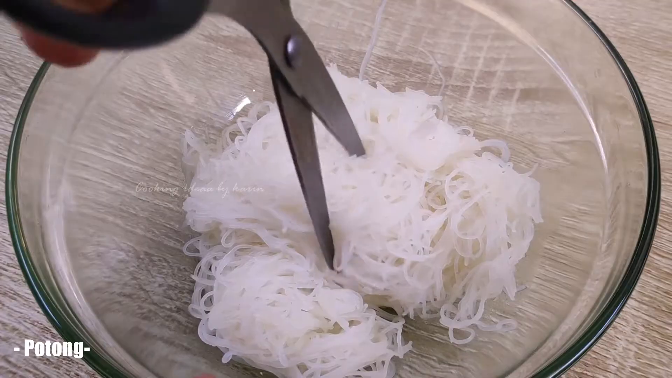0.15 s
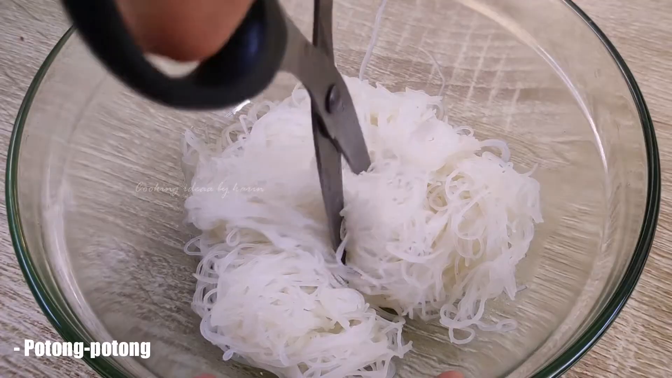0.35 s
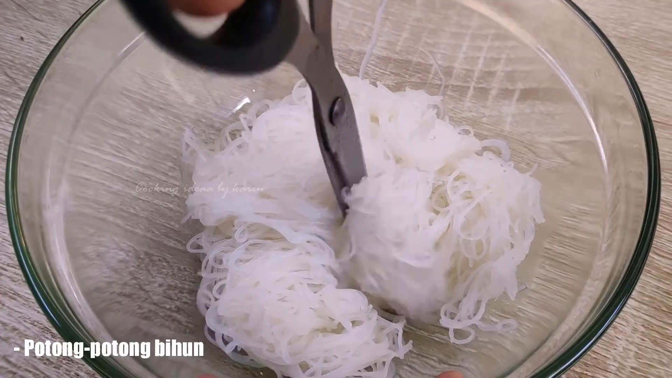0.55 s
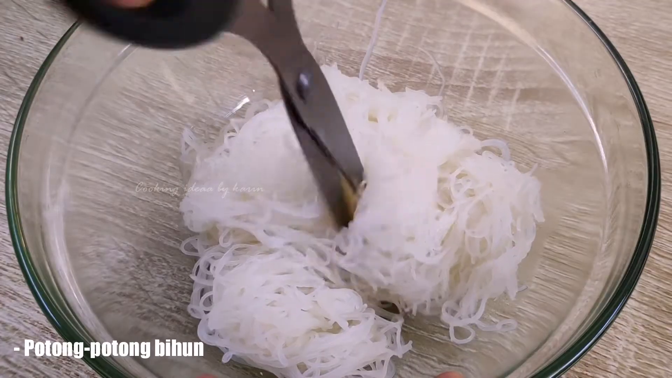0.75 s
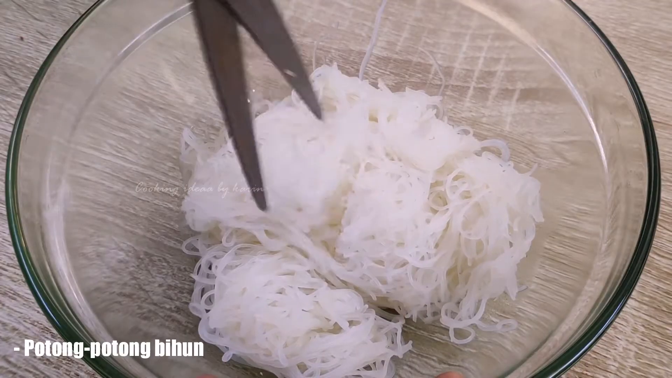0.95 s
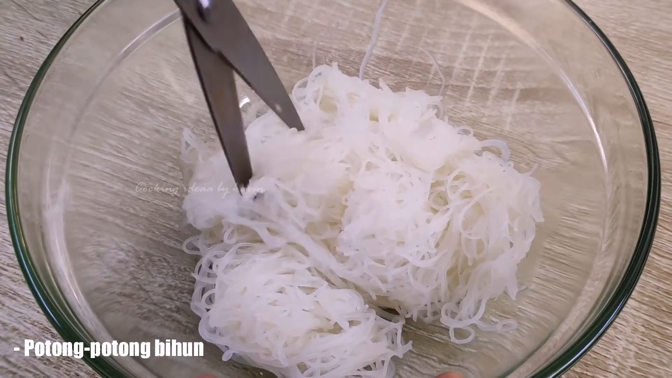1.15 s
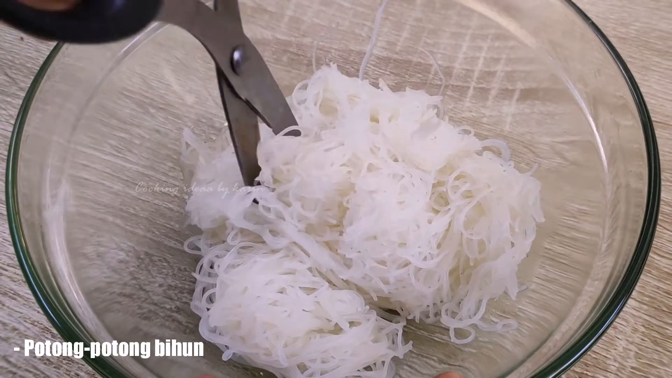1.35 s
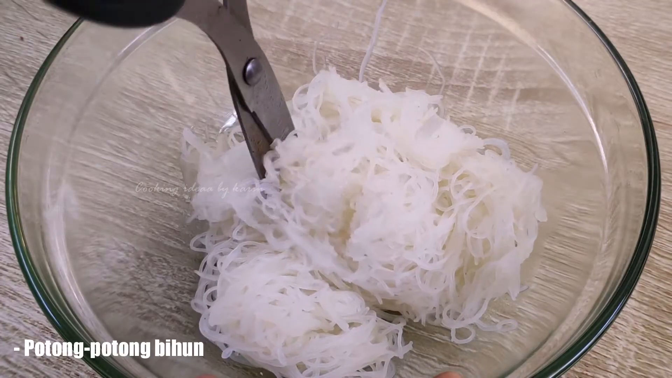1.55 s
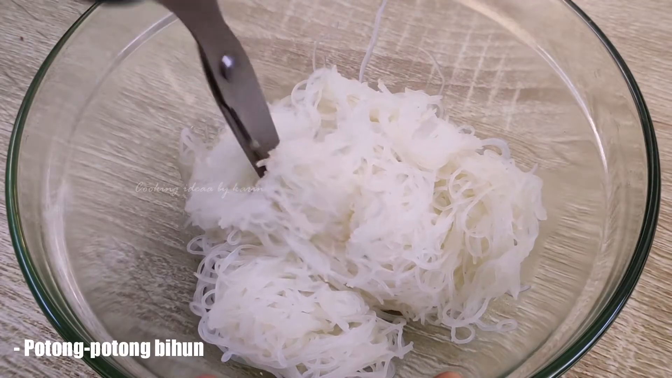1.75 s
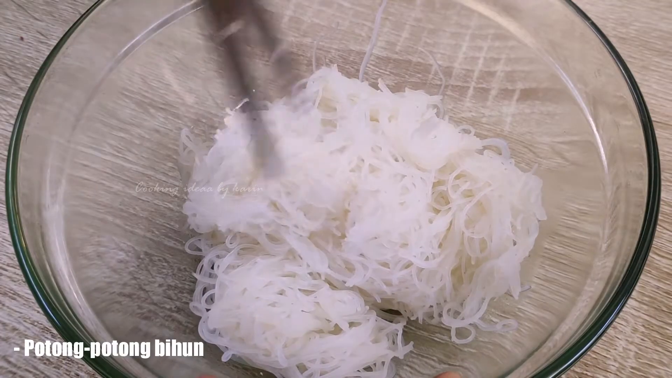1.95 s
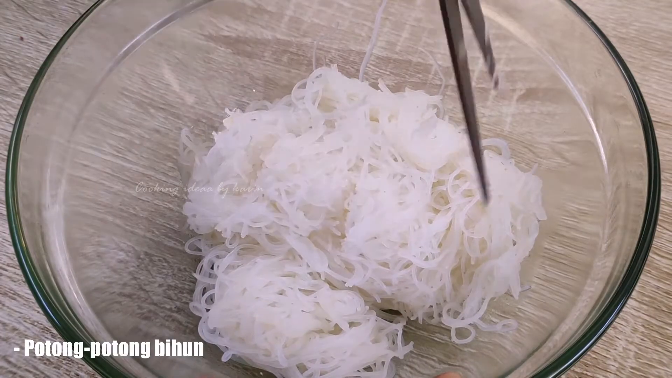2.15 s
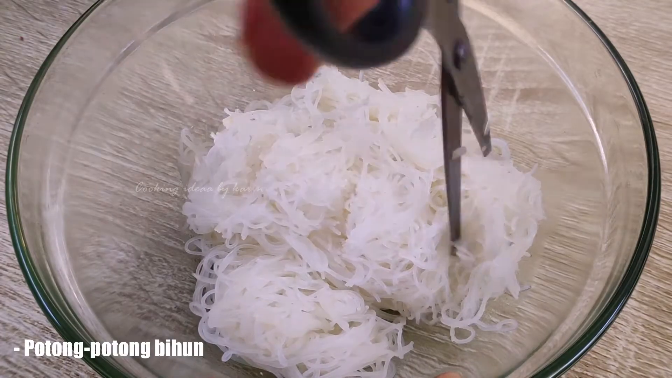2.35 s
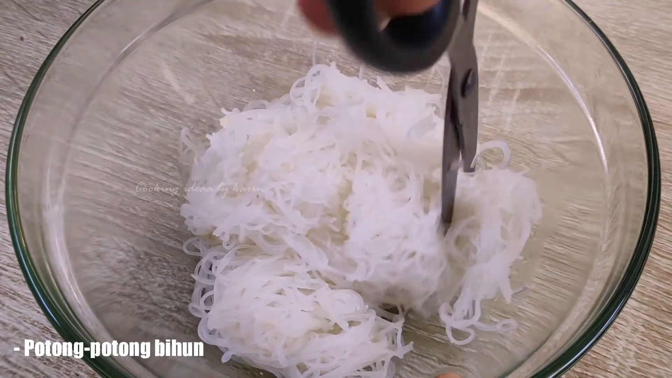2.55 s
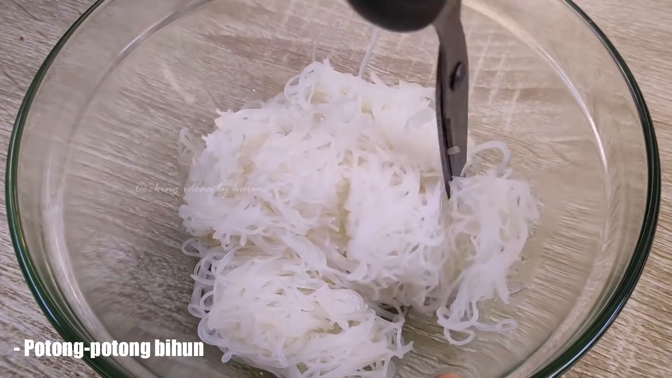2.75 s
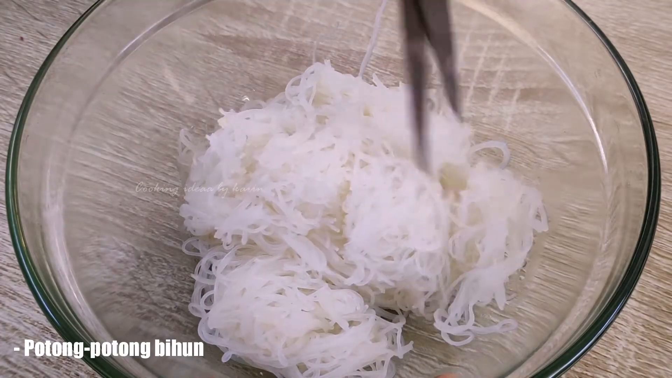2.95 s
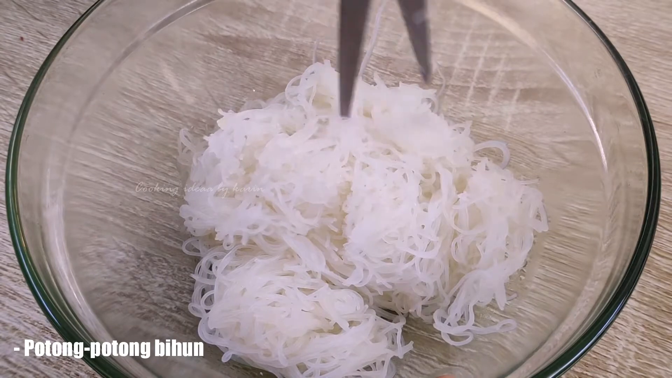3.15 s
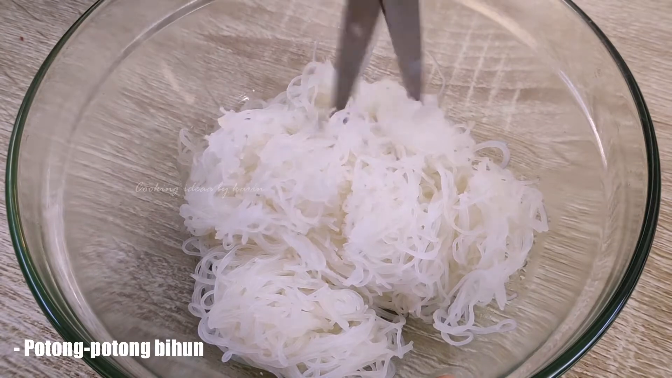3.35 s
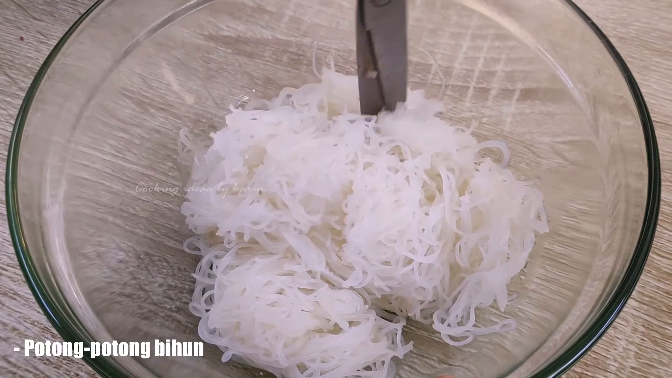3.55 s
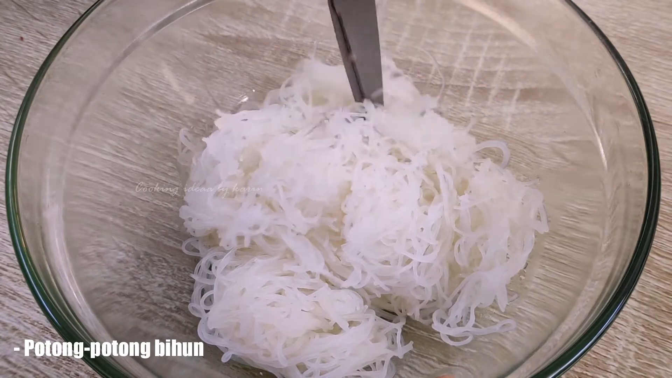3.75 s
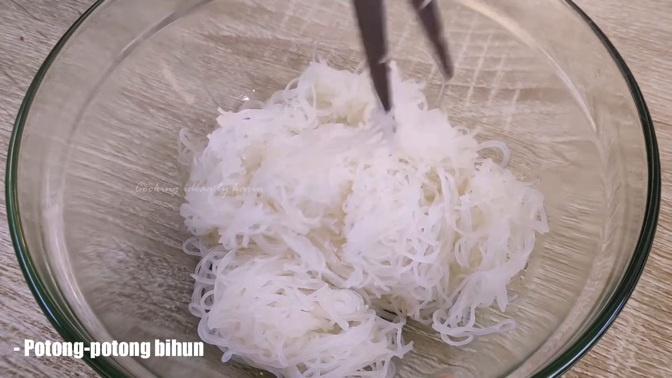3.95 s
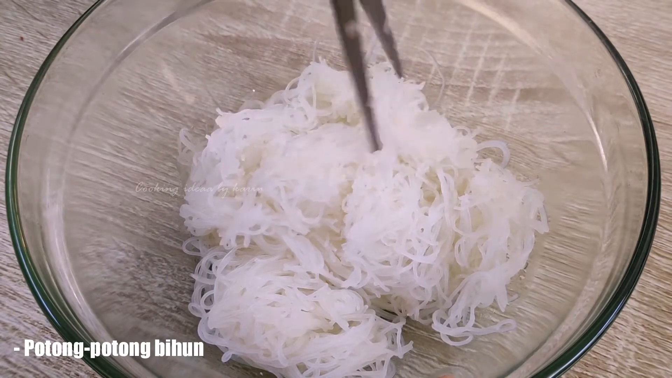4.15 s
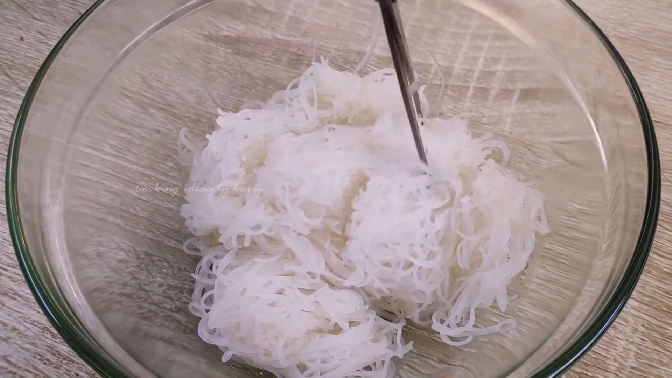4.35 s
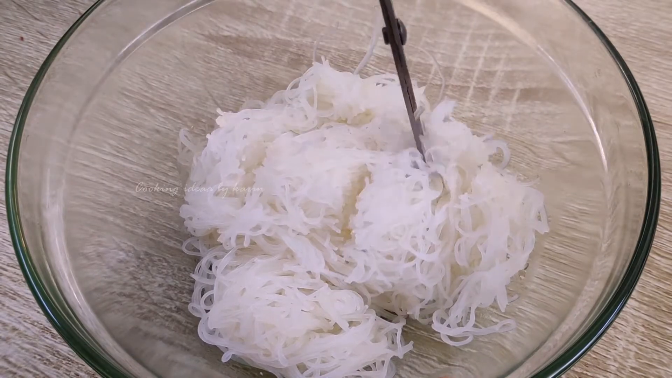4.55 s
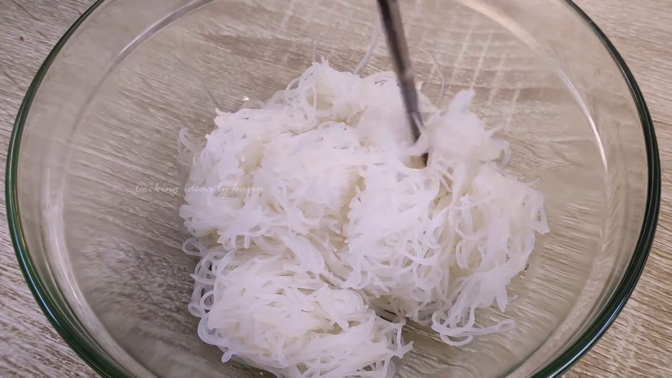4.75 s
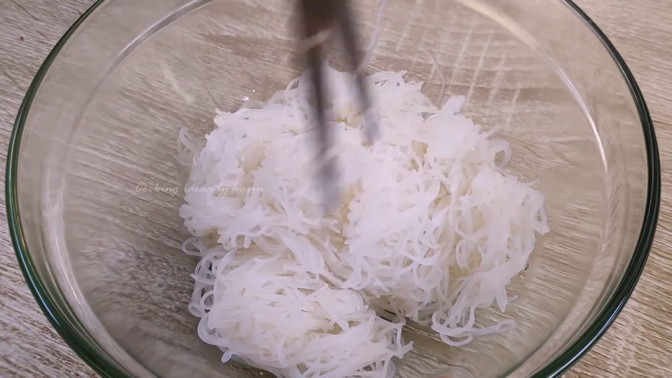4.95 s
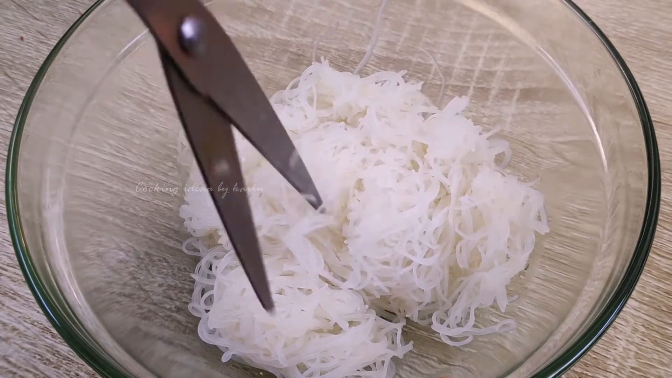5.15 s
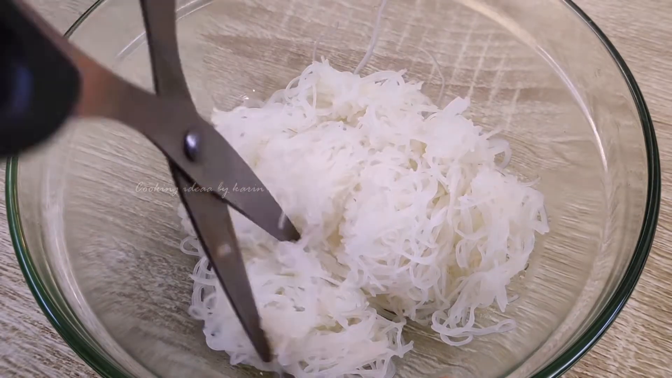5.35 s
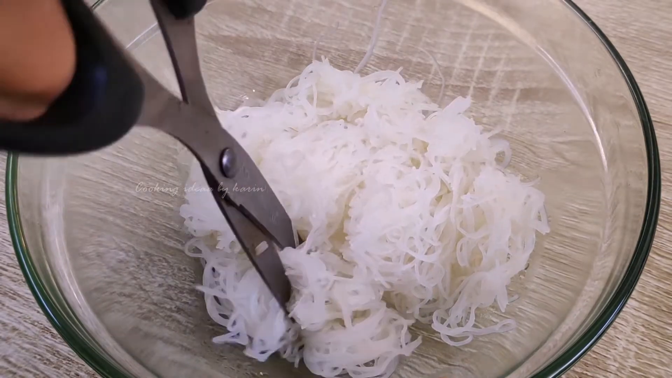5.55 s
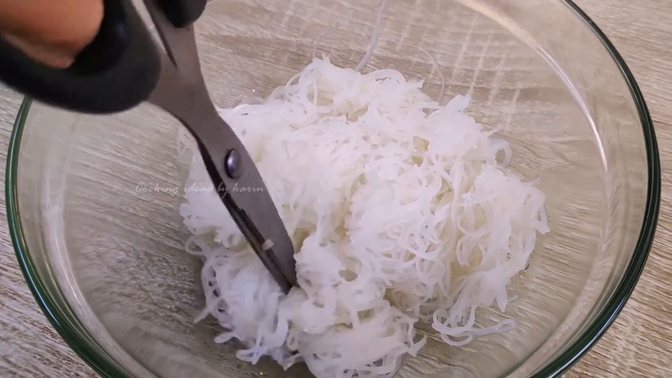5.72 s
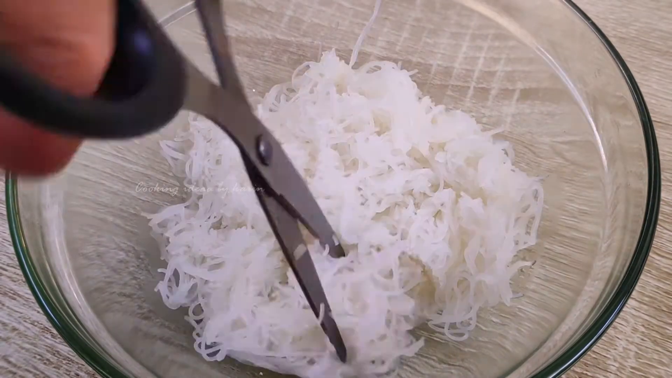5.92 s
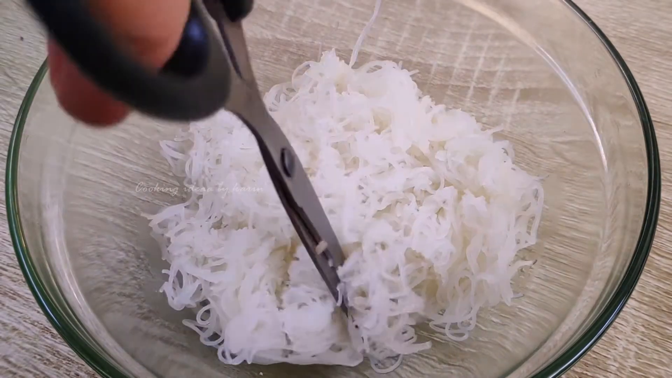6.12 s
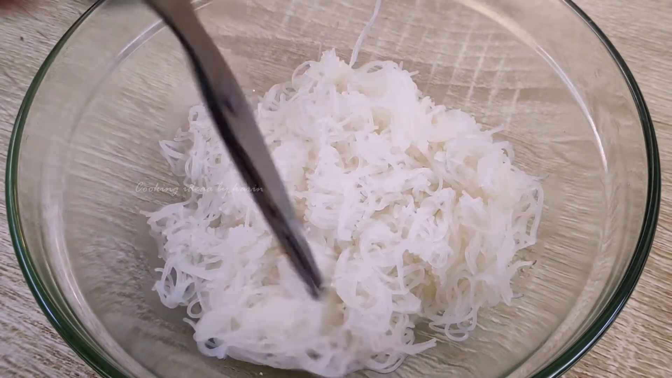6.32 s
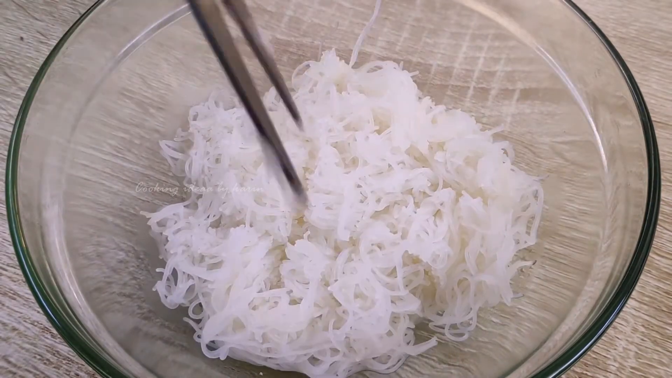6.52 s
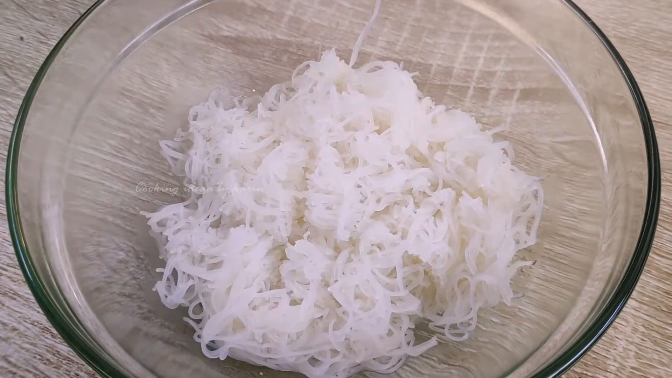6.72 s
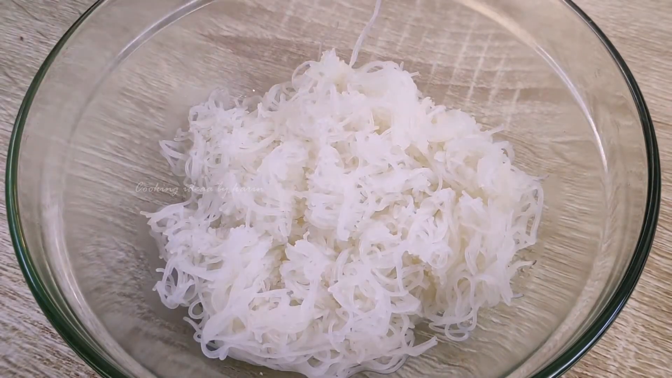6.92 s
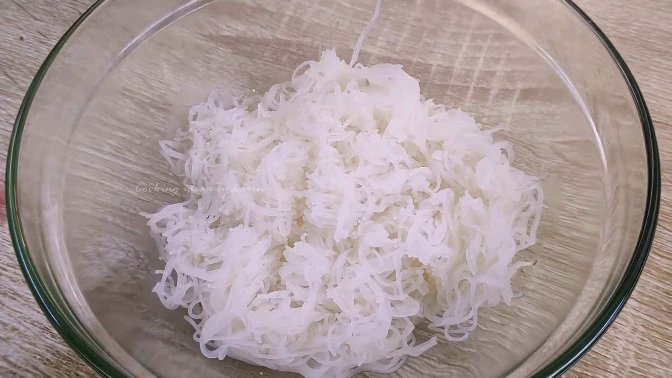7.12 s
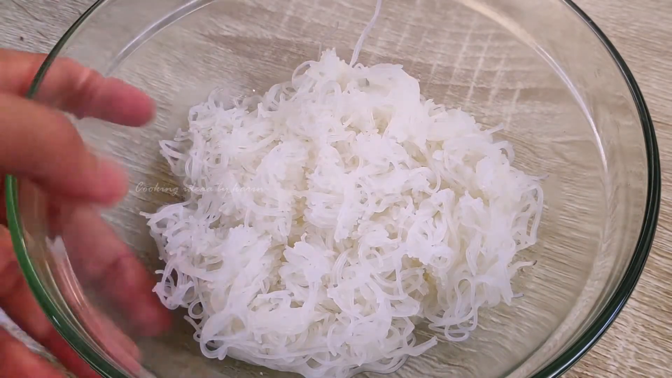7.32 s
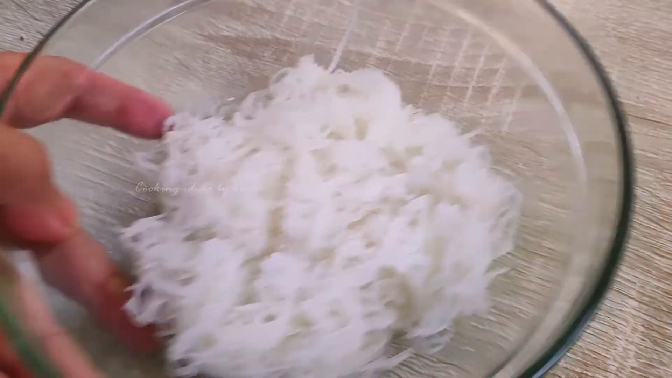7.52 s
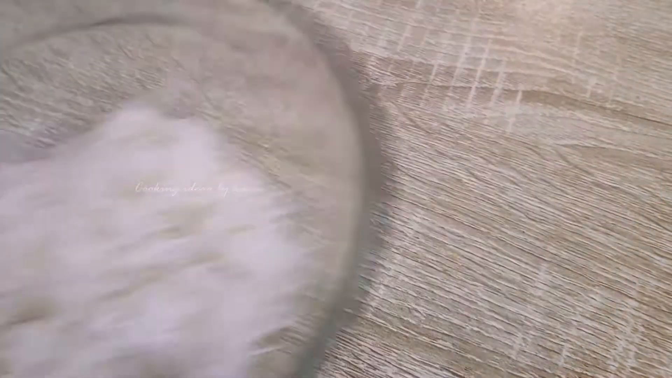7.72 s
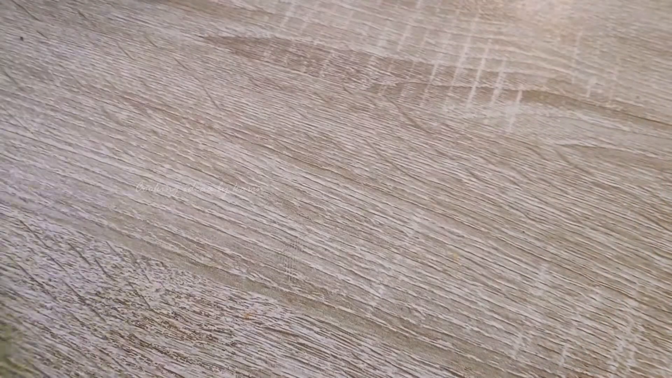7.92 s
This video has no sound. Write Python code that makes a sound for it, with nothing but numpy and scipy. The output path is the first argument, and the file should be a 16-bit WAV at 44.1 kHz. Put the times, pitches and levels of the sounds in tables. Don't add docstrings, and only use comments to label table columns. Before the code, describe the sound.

Seven bright steel scissor snaps, with blade ticks and hard glass knocks between them, end in a short gritty drag of a glass bowl on wood.

```python
import sys
import numpy as np
from scipy import signal
from scipy.fft import rfft, irfft
from scipy.io import wavfile
from scipy.ndimage import uniform_filter1d

SR = 44100
rng = np.random.default_rng(int(sys.argv[2]) if len(sys.argv) > 2 else 0)


def volts_from_db(level):
    exponent = np.asarray(level, float) / 20
    return 10 ** exponent


def digitize_waveform(pressure):
    field = np.atleast_2d(pressure).T
    bounded = np.clip(field, -1, 1)
    quanta = np.round(bounded * 32767).astype(np.int16)
    wavfile.write(sys.argv[1], SR, quanta)


N = 356138
SCENE_CHANGE_S = 5.94


def rms_one(x):
    return x / np.sqrt(np.mean(x ** 2) + 1e-20)


def pan(db):
    return volts_from_db(db * np.array([[.5], [-.5]]))


def add(out, s, piece):
    at = round(s * SR)
    out[:, at:at + piece.shape[1]] += piece[:, :N - at]


def swells(rows):
    t = np.arange(0, N, 8) / SR
    shapes = []
    for s, db, rise, hold, fall in rows:
        before, after = (s - t) / abs(rise), (t - s - hold) / abs(fall)
        shapes.append(db - 20 * np.maximum(np.maximum(before, after), 0))
    return np.max(shapes, axis=0).repeat(8)[:N]


def pair(alike, size=N):
    mid, side = rng.standard_normal((2, size))
    alike = np.clip(alike, 0, 1)
    return np.sqrt((1 + alike) / 2) * mid + np.sqrt((1 - alike) / 2) * side * [[1], [-1]]


def burst(t60, alike, size=1500):
    return pair(alike, size=size) * volts_from_db(-60 * np.arange(size) / SR / t60)


def ring(x, hz, t60):
    r, w = volts_from_db(-60 / (t60 * SR)), 2 * np.pi * hz / SR
    return signal.lfilter([0, np.sin(w)], [1, -2 * r * np.cos(w), r * r], x + 1e-18)


def band(x, low_hz, high_hz):
    edges = [low_hz, min(high_hz, .45 * SR)]
    return signal.sosfilt(signal.butter(2, edges, "band", fs=SR, output="sos"), x)


def lift(x, *bands):
    return x + sum((gain - 1) * band(x, low_hz, high_hz) for gain, low_hz, high_hz in bands)


def at_hz(points, hz):
    return np.interp(np.log(hz), np.log(np.array(points)[:, 0]), np.array(points)[:, 1])


def minimum_phase(db):
    bins = db.shape[1] - 1
    cepstrum = irfft(db * np.log(10) / 20)
    cepstrum[:, 1:bins] *= 2
    cepstrum[:, bins + 1:] = 0
    return irfft(np.exp(rfft(cepstrum)))


# [f/Hz, left-right level/dB]
PORT_TINT = [(250, -13), (600, -10.5), (1100, 0), (2000, -5.5), (4500, 1.5), (6800, -4), (8600, 13),
             (10000, 20.5), (14000, 11)]


def colour(x, spectrum, ports=0.):
    hz = np.maximum(np.arange(2049) * SR / 4096, 1)
    pulse = minimum_phase(at_hz(spectrum, hz) + ports * at_hz(PORT_TINT, hz) * [[.5], [-.5]])
    pulse /= np.sqrt(np.sum(pulse ** 2) / 2)
    return signal.oaconvolve(x * np.ones((2, 1)), pulse, axes=1)[:, :x.shape[-1]]


def shade(x, table):
    hz = np.maximum(np.arange(257) * SR / 512, 1)
    table = np.array(table)
    db = np.array([at_hz(table[:, [0, k]], hz) for k in (1, 2)])
    return signal.oaconvolve(x, minimum_phase(db), axes=1)[:, :N]


# [f/Hz, level/dB]
HISS_SPECTRUM = [(60, -25), (150, -27.5), (250, -17), (400, -25.5), (600, -27), (1000, -21.5),
                 (1500, -14.5), (2500, -16.5), (5000, -20.5), (7500, -13), (9500, -17.5), (12000, -22.5),
                 (15500, -19.5), (16500, -69.5)]
# [f/Hz, level/dB]
FRIDGE_TONES = [(145.3, -63), (226.1, -71), (290.7, -63), (398.4, -72), (689.1, -82.5), (888.2, -81.5),
                (1281, -79.5)]
# [t/s, level/dB, rise/s, hold/s, fall/s]
LEANS = [(1.75, -54, 0.25, .02, 0.17), (2.62, -50, 0.21, 0.018, 0.19), (3.78, -57.5, 0.37, 0.017, 0.17),
         (7.05, -54, 0.29, 0.048, 0.93), (5.82, -51.5, 0.43, 0.024, .3), (7.65, -49, 0.34, 0.17, 0.44),
         (7.98, -45, 0.11, .1, .2)]


def background():
    t = np.arange(N) / SR
    hiss = band(pair(.2), 420, 19000) + 14 * band(rng.standard_normal(N), 15, 460)
    hiss = rms_one(band(colour(hiss, HISS_SPECTRUM), 170, 19000))
    stir_db = 2.7 * np.exp(-((t - 7.1) / 0.4) ** 2)
    hum = 0
    for hz, db in FRIDGE_TONES:
        waver = 1 + 0.25 * rms_one(band(rng.standard_normal(N), 2.4, 13))
        hum = hum + volts_from_db(db + 3.5) * np.sin(2 * np.pi * hz * t) * waver

    deep_db, low_db = -62.5, -64
    heavy_deep_db, heavy_low_db, sag_db_per_s = -53, -49, 8.5
    heavy = uniform_filter1d(1. * (t > SCENE_CHANGE_S) * (t < 7.07), size=900)
    heavy_low_db = heavy_low_db - sag_db_per_s * (t - SCENE_CHANGE_S)
    low_db = np.maximum(low_db + heavy * (heavy_low_db - low_db), swells(LEANS))
    deep_db = deep_db + heavy * (heavy_deep_db - deep_db)
    deep = rms_one(band(band(pair(0.93), 25, 43), 25, 43))
    shake = pair(0.93)
    low = band(shake, 64, 118) + .0015 * ring(shake, 74, .5)
    low = low + .0015 * heavy * ring(shake, 101, .5)
    return volts_from_db(stir_db - 61) * hiss + hum + volts_from_db(deep_db) * deep + volts_from_db(low_db) * rms_one(low)


# [t/s, length/s, start f/Hz, end f/Hz, level/dB]
WHISTLES = [
    (0.0, 0.16, 2895, 2870, -56),
    (.085, 0.12, 2846, 2835, -51),
    (0.1, 0.29, 2965, 2956, -55),
    (0.166, 0.22, 3040, 2990, -57.5),
    (.31, 0.19, 3010, 2955, -64),
    (7.23, 0.16, 2490, 2500, -71),
    (7.3, 0.2, 2505, 2520, -67.5),
    (7.385, .2, 2510, 2620, -65),
    (7.47, 0.17, 2590, 2640, -66),
]


def bird():
    out = np.zeros((2, N))
    edge_s, release_s, fade_db_per_s = 0.033, 0.082, 68
    for s, length, start_hz, end_hz, db in WHISTLES:
        t = np.arange(round(length * SR)) / SR
        waver = 1 + 0.4 * rms_one(band(pair(0.26, size=len(t)), 10, 50))
        edge = np.clip(np.minimum((t + 0.0064) / edge_s, (length - t) / release_s), 0, 1)
        tone = np.sin(2 * np.pi * (start_hz + (end_hz - start_hz) * t / length / 2) * t)
        add(out, s, volts_from_db(db + 6.5 - fade_db_per_s * t) * edge * waver * tone)
    return out


# [f/Hz, time to fall 60 dB/s]
ROOM_T60 = [(400, 0.92), (1500, 0.94), (4000, 0.8), (9000, 0.67), (15000, 0.45)]
BUILD_S = [
    [0.008],
    [0.019],
]


def room_pulse():
    t, edges = np.arange(SR) / SR, 200 * 2 ** np.arange(0, 7, .5)
    spikes = rng.exponential(1, SR // 40 + 1).repeat(40)[:SR]
    grain = volts_from_db(2 * spikes * np.exp(-t / 0.14))
    out = 0
    for low, high in zip(edges, edges[1:]):
        t60 = at_hz(ROOM_T60, low * 1.33)
        out = out + band(pair(0.13, size=SR) * grain, low, high) * volts_from_db(-60 * t / t60)
    out = out * (1 - np.exp(-t / BUILD_S))
    return out / np.sqrt(np.sum(out ** 2) / 2)


def kitchen(x):
    before, pulse = np.arange(N) < SCENE_CHANGE_S * SR, room_pulse()
    return sum(signal.oaconvolve(x * part, pulse, axes=1)[:, :N] * part for part in (before, ~before))


# [t/s, scrape level/dB]
SLIDE = [
    (7.48, -68.5),
    (7.568, -56),
    (7.666, -49),
    (7.798, -46.5),
    (7.86, -49),
    (7.94, -54),
    (7.974, -53),
    (8.04, -58.5),
    (8.075, -63),
]
# [f/Hz, width/Hz, level/dB]
SLIDE_RINGS = [(1600, 36, -18), (4410, 74, -19), (6820, 62, 3.5), (7660, 70, -6), (7340, 58, -8),
               (8840, 120, -2), (10130, 140, -4), (10450, 38, -15), (12500, 50, -10), (13900, 53, -13)]
# [f/Hz, level/dB per Hz]
TABLE_SPECTRUM = [(47, -23), (80, -24), (139, 16), (178, 2), (283, -3), (1200, -23), (1560, -17),
                  (5770, -26), (8790, -18.5), (16000, -50)]
# [f/Hz, t/s, level/dB, hold/s]
BINDS = [(1500, 7.58, -54, 0.022), (1560, 7.63, -67, .03), (2600, 7.685, -68, .02),
         (2780, 7.745, -60, 0.03), (1610, 7.805, -58, 0.055), (1850, 7.83, -55, 0.045),
         (2430, 7.83, -61, 0.056), (970, 7.76, -55, .03), (280, 7.64, -46, 0.038), (306, 7.76, -44, 0.038),
         (3480, 7.66, -59, .03)]


def slide():
    scrape_db = np.interp(np.arange(N) / SR, *np.transpose(SLIDE), left=-150, right=-150)
    drone_db = -40.5 + 1.17 * (scrape_db + 47)
    glass_db = -55 + 2.2 * (scrape_db + 47)
    grit = pair(0.17) * volts_from_db(1.4 * rng.exponential(1, N))
    judder = volts_from_db(2.5 * rms_one(band(rng.standard_normal(N), 8, 40)))
    drone = band(pair(1.0), 107, 403) + 0.0055 * ring(grit[0], 286, 0.12)
    scrape = rms_one(band(colour(grit * judder ** 0.55, TABLE_SPECTRUM, ports=0.49), 680, 21700))
    sung = 0
    for hz, width, db in SLIDE_RINGS:
        sung = sung + volts_from_db(db) * rms_one(ring(grit * judder, hz, 2.9 / width)) * np.sqrt(width)
    out = volts_from_db(drone_db) * rms_one(drone * judder) + volts_from_db(scrape_db + 4.5) * scrape
    out = out + volts_from_db(glass_db + 10.5) * rms_one(sung)
    for hz, s, db, hold in BINDS:
        push = grit if hz > 400 else grit[1]
        out = out + volts_from_db(swells([(s, db, .03, hold, .04)])) * rms_one(ring(push, hz, 0.074))
    return out


# [t/s, level/dB, f/Hz, spread/octaves]
BUMPS = [(3.53, -46, 1210, 0.4), (3.553, -47, 1280, 0.4), (3.712, -36, 598, 1.1), (3.7075, -30, 1200, 1.5),
         (5.58, -55, 1100, 0.48), (5.745, -36, 686, 2.2), (2.749, -44.5, 1200, 1.2),
         (1.69, -44.5, 1300, 1.1), (6.16, -43.5, 577, 1.7), (7.06, -49.5, 420, 1.23),
         (7.972, -30, 260, 1.5), (8.004, -33, 170, 1.2), (5.606, -55, 1120, .6)]


def dull_bumps():
    out = np.zeros((2, N))
    for s, db, hz, octaves in BUMPS:
        half = 2 ** (octaves / 2)
        add(out, s, band(burst(0.062, 0.92, size=5000), hz / half, hz * half) * volts_from_db(db + 17.0))
    return out


# [t/s, peak level/dB, thud level/dB, boom level/dB, left-right level/dB]
KNOCKS = [
    [(1.476, -15.5, -31.5, -42, 1.5)],
    [(2.4323, -9.5, -36, -38, -0.5)],
    [(3.4885, -36.5, -56.5, -49.5, -0.5), (3.6221, -38, -51.5, -46.5, 1.5), (5.452, -49, -60, -51, 0.5),
     (5.558, -53.5, -69, -57, 5), (6.0625, -16, -30, -39, 3)],
]
# [f/Hz, time to fall 60 dB/s, level at each of three spots/dB below the knock]
BOWL = [(511, 0.5, -37, -47, -33), (730, 0.4, -41, -43, -36), (1265, 0.3, -43, -38, -44),
        (2880, 0.3, -55, -57, -49), (4411, 0.55, -54, -41, -40), (5120, 0.44, -53, -60, -53),
        (6796, 0.8, -28, -48, -49), (6934, 0.5, -29, -47, -51), (7160, 0.5, -49, -55, -53),
        (9000, 0.45, -38, -45, -40), (9109, 0.5, -48, -44, -41), (9757, 0.4, -45, -40, -31),
        (9954, 0.42, -49, -33, -38), (10110, 0.41, -48, -34, -38), (10280, 0.37, -38, -49, -47),
        (10560, 0.5, -58, -43, -46), (11260, 0.3, -50, -56, -48), (11390, 0.5, -68, -36, -40),
        (12615, 0.25, -44, -48, -42), (12780, 0.43, -60, -41, -54), (13800, 0.25, -58, -46, -50),
        (15150, 0.3, -68, -51, -52)]
# [blade ping f/Hz, hard clack f/Hz, first dull f/Hz, second dull f/Hz, bounce level/dB]
SPOTS = [
    (9000, 1200, 520, 960, -32.5),
    (11000, 2400, 320, 727, -1.5),
    (9000, 1225, 495, 1100, -25),
]
CLACK_DB = (6, 4, -3)


def knocks():
    glass, thuds = np.zeros((2, N)), np.zeros((2, N))
    t = np.arange(SR // 4) / SR
    hz, t60, *spots_db = np.transpose(BOWL)[:, :, None, None]
    damped = 1 + volts_from_db(16 * np.minimum(hz / 9000, 1) + 7 - 60 * t / .06)
    for spot_db, spot, clack_db, rows in zip(spots_db, SPOTS, CLACK_DB, KNOCKS):
        ping_hz, clack_hz, *dull_hz, bounce_db = spot
        for s, db, thud_db, boom_db, pan_db in rows:
            turns = np.cumsum(rng.random((len(BOWL), 2, 1)) * [[1], [.3]], axis=1)
            soft_db = .2 * (db + 17.0) * (hz > 12000)
            level = damped * volts_from_db(spot_db + soft_db - 105 * t / t60)
            modes = np.sum(level * np.sin(2 * np.pi * (hz * t + turns)), axis=0)
            ping = volts_from_db(-60 * t / .035) * np.sin(2 * np.pi * ping_hz * t)
            add(glass, s, (modes * volts_from_db(7.5) + ping) * volts_from_db(db) * pan(pan_db))
            add(glass, s, band(burst(0.03, 0.24), 6300, 9500) * volts_from_db(db + 0.5) * pan(pan_db))
            bounce = band(burst(0.02, 0.42), 4600, 11000)
            add(glass, s + 0.0044, bounce * volts_from_db(db + bounce_db) * pan(pan_db))

            dull = sum(np.sin(2 * np.pi * note_hz * t) for note_hz in dull_hz) * volts_from_db(-60 * t / 0.031)
            dull += volts_from_db(clack_db - 60 * t / 0.013) * np.sin(2 * np.pi * clack_hz * t)
            add(thuds, s, dull * volts_from_db(thud_db + 7.5) * pan(pan_db - 4.5))
            add(thuds, s, band(burst(0.035, 0.6, size=4000), 230, 1730) * volts_from_db(thud_db + 18))
            slump = burst(0.44, 0.51, size=20000)
            slump = band(slump, 350, 1300) + .008 * ring(slump, dull_hz[1], .08)
            add(thuds, s, slump * volts_from_db(thud_db - 2.5))
            add(thuds, s, band(burst(0.8, 1.0, size=20000), 130, 500) * volts_from_db(boom_db + 13.0))
    return glass, thuds


# [t/s, peak level/dB, left-right level/dB, f/Hz]
TICKS = [(0.5762, -36, 9, 11000), (0.582, -35, 7, 9500), (0.5975, -34, 8, 11000),
         (1.5734, -44.5, -10.5, 9010), (1.6024, -51, -1.5, 11000), (1.614, -50.5, -5.5, 11000),
         (1.8714, -36, 5, 9350), (1.91, -35, -17, 8320), (2.666, -44, -6, 9000), (2.9312, -30, 3.5, 7680),
         (3.656, -43, 6, 9130), (4.5855, -55, -10, 7630), (4.889, -31, 1, 7600), (5.4207, -47, 0, 9300),
         (5.618, -51.5, 0, 6960), (5.657, -46, 1, 11000), (5.693, -41, 0, 9000), (5.705, -41, 0, 7500),
         (5.7175, -39, 4, 9560), (5.904, -38, -1, 6000), (5.932, -39, -2, 6970), (3.892, -34.5, -3, 7970),
         (5.665, -40, -2, 8450), (3.6505, -48, 0, 7500), (2.748, -39.5, -1, 7000), (6.414, -35, -20, 7730),
         (7.5714, -41, 1, 8870)]
# [t/s, peak level/dB, left-right level/dB, f/Hz]
LAST_SLIPS = [
    (.6187, -27, -5, 7800),
    (.6357, -28, -2, 8200),
    (1.669, -35, 1, 9500),
    (1.6815, -34, 3, 10500),
    (2.733, -42, -3, 7900),
    (3.676, -38, 1, 10500),
    (4.665, -50, 0, 9500),
    (4.682, -38, -2, 7700),
    (6.213, -40, 1, 7800),
]
# [t/s, peak level/dB, left-right
# level/dB, f/Hz]
GRAINS = [(.283, -56, 0, 11000), (.305, -52, 0, 11000), (.41, -53, 0, 9000), (.592, -40, 0, 8000),
          (.808, -32, 0, 8000), (1.622, -52, 0, 12000), (1.648, -50, 0, 6000), (4.608, -52, 0, 7970),
          (4.658, -53, 0, 8500), (4.674, -44, 0, 10500), (4.714, -29.5, 1, 11040), (5.605, -51, 0, 8000),
          (5.625, -51, 0, 8000), (5.635, -52, 0, 9000), (5.648, -49, 0, 7500), (5.713, -44, 0, 8000),
          (3.7055, -24, -4, 11000), (2.7975, -25, 5, 10500)]


def ticks(rows):
    out = np.zeros((2, N))
    for s, db, pan_db, hz in rows:
        crack = burst(.006, .5)
        crack = band(crack, hz * 0.82, hz * 1.3) + 0.46 * band(crack, 5880, 16000)
        add(out, s, crack * volts_from_db(db + 4) * pan(pan_db))
    return out


# [rub level/dB, pivot squeak level/dB, swell/dB per s, last skid level/dB below the snap]
CLOSINGS = [(-54.5, -54, 698, -17.5), (-57, -57, 199, -18.5), (-62, -55, 496.5, -11.5),
            (-63, -58, 591, -16.5), (-73, -71, 149.5, -16.5), (-66, -62, 97.5, -13),
            (-61.5, -61.5, 299.5, -19.5)]
# [t/s, level/dB, rise/s, hold/s, fall/s], rise and fall over 20 dB
CATCHES = [(.578, -67, 0.0043, .03, .02), (.4, -80.5, 0.62, 0.25, .2), (2.664, -68, .008, .003, .02),
           (3.623, -63, 0.0011, .003, .03), (4.56, -81, 0.19, 0.07, 0.079), (7.06, -78, 0.66, 0.0047, .015),
           (7.25, -80.5, 0.14, 0.11, 0.27)]
# [t/s, level/dB, rise/s, hold/s, fall/s], rise and fall over 20 dB
SQUEAKS = [(.494, -58, 0.053, .02, 0.26), (1.56, -58.5, 0.027, 0.0033, 0.13),
           (2.664, -54, 0.022, .003, 0.019), (2.62, -60, 0.1, 0.017, 0.026),
           (4.592, -56.5, 0.068, 0.0029, 0.045), (5.56, -66, 0.091, .1, 0.11),
           (6.166, -55, 0.19, .003, 0.025), (7.06, -66, 0.64, .004, 0.013), (7.22, -72.5, 0.18, .16, .12)]


def rubbing():
    rubs, squeaks = list(CATCHES), list(SQUEAKS)
    for (s, *_), (rub_db, squeak_db, db_per_s, _) in zip(SNAPS, CLOSINGS):
        let_go_s = s - 0.014
        rubs.append((let_go_s, rub_db, 20 / db_per_s, 0, .001))
        squeaks.append((let_go_s, squeak_db, 20 / db_per_s, 0, .001))
    grit = pair(0.29) * volts_from_db(1.5 * rng.exponential(1, N))
    hiss = volts_from_db(swells(rubs) + 14.5) * rms_one(band(grit, 6000, 11000))
    squeak = ring(ring(pair(.4), 7700, .005), 7750, .003)
    return hiss + volts_from_db(swells(squeaks)) * rms_one(squeak) * pan(-14.5)


# [bright level/dB, left-right level/dB, dull level/dB, creak before level/dB]
CHATTER = [(-23, 5, -36, -60), (-22, 9, -34, -54), (-18, 10, -34, -55), (-13, 5, -32, -56),
           (-22, 3, -33, -56), (-15, 5, -32, -56), (-22, 8, -34, -58)]


def chatter():
    out = np.zeros((2, N))
    for (s, *_), (bright_db, pan_db, dull_db, creak_db) in zip(SNAPS, CHATTER):
        uneven_db = 2.5 * rng.exponential(1, 76).repeat(40)[:3000] - 4
        rattle = burst(.055, .4, size=3000) * volts_from_db(uneven_db)
        bright = band(rattle, 7500, 12500) + volts_from_db(-10.5) * band(rattle, 3000, 7000)
        add(out, s + .004, bright * volts_from_db(bright_db) * pan(pan_db))
        add(out, s + .004, band(rattle, 500, 2500) * volts_from_db(dull_db))
        creak = band(pair(.5, size=480) * np.hanning(480), 500, 12000)
        add(out, s - .013, creak * volts_from_db(creak_db + 14))
    return out


# [f/Hz, level/dB per Hz]
SNAP_SPECTRUM = [(290, -49.5), (900, -36), (1500, -28), (2700, -38), (3370, -33), (4930, -23.5),
                 (5800, -8.5), (6810, -14), (9140, -3.5), (10900, -13), (13200, -22), (15100, -9),
                 (16700, -33)]
TINT_HZ = (2200, 3800, 6700, 8200, 9700, 11500, 13500, 15500)


def steel_crack(shrill_db, pan_db, tone, tints):
    low_db, low_pan_db, zing_db, top_db = tone
    crack = burst(.005, .5, size=2500) + 6.5 * signal.unit_impulse(2500)
    crack = colour(crack, SNAP_SPECTRUM, ports=.9)
    crack = crack + .5 * np.roll(crack[::-1], 42, axis=1)
    crack = lift(crack, (volts_from_db(5.5), 680, 9300), (volts_from_db(shrill_db), 10300, 12400))
    crack = lift(crack, (volts_from_db(low_db) * pan(low_pan_db), 300, 3000), (volts_from_db(zing_db), 4800, 7400),
                 (volts_from_db(top_db), 13000, 17000))
    crack = crack / np.abs(crack).max(axis=1, keepdims=True) * pan(np.clip(pan_db, -1.5, 1.5))
    return shade(crack, np.column_stack([TINT_HZ, *np.pad(tints, [(0, 0), (1, 2)])]))


# [f/Hz, level/dB per Hz]
ECHO_SPECTRUM = [(300, -26), (600, -24.5), (1000, -29), (1700, -23), (2600, -27.5), (4200, -19),
                 (6200, -13), (7500, -11.5), (8800, 1), (9500, 0), (10800, -5.5), (12000, -17),
                 (15000, -12), (16500, -23.5)]
# [f/Hz, level/dB]
ECHO_GAPS = [(4200, 3), (6900, -4), (8100, -4), (12400, 3), (13500, -3)]


def room_click(room_db, shrill_db, tone, notes):
    deep_db, middle_db = tone
    click = colour(signal.unit_impulse(2500), ECHO_SPECTRUM, ports=0.32)
    click = volts_from_db(room_db) * lift(click, (volts_from_db(shrill_db), 10030, 13000))
    click = lift(click, (volts_from_db(deep_db), 395, 1200))
    click = click + (volts_from_db(middle_db) - 1) * band(click, 3850, 6900)
    for hz, note_db in ECHO_GAPS + [notes[:2], notes[2:]]:
        click = lift(click, (volts_from_db(note_db), hz * .95, hz * 1.05))
    return click


# [t/s, peak level/dB, left-right level/dB held within 1.5, room level/dB, shrillness level/dB]
SNAPS = [
    (0.6416, -0.5, 3, 5, 0.5),
    (1.6958, -4.5, -5.5, 5.5, 3),
    (2.755, -0.5, 12.5, 6.5, 5.5),
    (3.6956, -2.5, -13, 6, 6.5),
    (4.696, -4.5, 4.5, 1.5, 0),
    (5.7369, -5, 5.5, 6.5, 3.5),
    (6.233, -1.5, 8, 6, 7.5),
]
# [handle knock level/dB, its left-right level/dB, blade zing level/dB, top level/dB]
SNAP_TONE = [(-6, -5.5, -9.5, -8), (-3, 8, -1.5, -9), (-1.5, 4.5, -9, -3), (3, 2.5, 1, -2.5),
             (1.5, -4, -9, -4.5), (-0.5, 1, -6, -4), (0.5, -1.5, -3.5, -3)]
# [low level/dB, middle level/dB]
ECHO_TONE = [(1.5, 0.5), (6, 1), (-1, 1), (2.5, 2), (-8, 0), (5, -0.5), (-4, 1)]
# [f/Hz, level/dB, f/Hz, level/dB]
ECHO_NOTES = [(8900, -3, 15000, -4), (5900, 3, 10800, -2), (9800, -6, 10700, 3), (6200, 3, 14200, 4),
              (4500, 3, 14500, -4), (10800, -5, 15000, -4), (10000, 3, 5000, 4)]
# [level/dB at 3.8, 6.7, 8.2, 9.7, 11.5 kHz]
LEFT_TINT = [(4, -8, -1, -2, 3), (6, -8, 0, 6, -2), (6, -7, 2, 0, 3), (3, -1, 6, 6, 1), (8, -6, 1, 1, -1),
             (-2, -6, 2, 4, 3), (2, -5, 3, 0, -3)]
# [level/dB at 3.8, 6.7, 8.2, 9.7, 11.5 kHz]
RIGHT_TINT = [(1, -7, -3, -2, -5), (0, -2, -6, 1, -5), (-2, -6, 1, -4, 5), (-2, 1, -8, 0, -3),
              (4, -2, -1, 4, 7), (0, -2, 0, 3, 2), (-1, -5, -3, 1, -4)]
# [delay t/s, level/dB, left-right level/dB]
WALLS = [(0.018, -26, 8.5), (.027, -25.5, 6.5), (0.034, -28.5, 8.5), (0.032, -24.5, 7.5), (.0045, -24, 4)]


def snaps():
    near, sent = np.zeros((2, N)), np.zeros((2, N))
    per_snap = zip(SNAPS, CLOSINGS, SNAP_TONE, ECHO_TONE, ECHO_NOTES, LEFT_TINT, RIGHT_TINT)
    for snap, (*_, skid_db), tone, echo_tone, notes, *tints in per_snap:
        s, db, pan_db, room_db, shrill_db = snap
        add(near, s + .0012, steel_crack(shrill_db, pan_db, tone, tints) * volts_from_db(db + 6))
        skid = burst(0.06, 0.24, size=700)[:, ::-1]
        skid = band(band(skid, 7100, 8700), 6500, 10000) * .6
        add(near, s - .0147, skid * volts_from_db(db + skid_db) * pan(-9.0))
        far_wall = colour(burst(0.018, 0.49), ECHO_SPECTRUM)
        add(near, s + .04, far_wall * volts_from_db(room_db - 37.5) * pan(9.6))
        click = room_click(room_db, shrill_db, echo_tone, notes)
        add(sent, s, click)
        answer = click + volts_from_db(-10.0) * ring(click, 9500, .004)
        for lag, wall_db, wall_pan_db in WALLS:
            add(near, s + lag, answer * volts_from_db(wall_db) * pan(wall_pan_db))
    return near, sent


# [f/Hz, left level/dB, right level/dB]
ECHO_SHADE = [(3000, 0.5, 0), (7500, -2.5, -1), (9000, -0.5, -7), (11500, -0.5, -4.5), (14500, 1, -5.5)]
# [f/Hz, left level/dB, right level/dB]
GLASS_SHADE = [(2500, 1, -1.5), (4200, -6, 0), (6000, -6, -4), (7700, -1, 3.5), (9000, 2.5, -4.5),
               (11470, -3, -9), (14560, -5, -9.5)]


def scene():
    shut, sent = snaps()
    glass, thuds = knocks()
    thuds = thuds + dull_bumps()
    glass = shade(glass, GLASS_SHADE)
    small = ticks(TICKS + LAST_SLIPS) + rubbing()
    sent = sent + volts_from_db(-17.0) * glass + volts_from_db(-18.0) * (small + thuds)
    echo = shade(kitchen(sent), ECHO_SHADE)
    out = background() + bird() + echo + slide() + glass + thuds + small + ticks(GRAINS) + chatter() + shut
    out[0] = np.roll(out[0], 10)
    return out


def top_cut(x):
    return signal.sosfilt(signal.butter(12, 16830, fs=SR, output="sos"), x)


def record(dry):
    over_db = np.maximum(20 * np.log10(np.abs(dry).max(axis=0) + 1e-9) + 17, 0)
    climb_db = 600 * np.arange(N) / SR
    held_db = np.maximum.accumulate(over_db + climb_db) - climb_db
    r = np.exp(-1 / (.0025 * SR))
    x = dry * volts_from_db(-.72 * signal.lfilter([1 - r], [1, -r], held_db))
    x = np.clip(x, -1, 1)
    shelved = signal.sosfilt(signal.ellip(10, .3, 45, 15850, fs=SR, output="sos"), x)
    loud = 1. * (held_db > 5) * (uniform_filter1d(over_db, size=200) > 1)
    x = shelved + uniform_filter1d(loud, size=64) * band(x, 15950, 17500)
    x = signal.sosfilt(signal.ellip(10, .3, 70, 16750, fs=SR, output="sos"), x)
    return top_cut(x)


dry = scene()
out = record(dry)
digitize_waveform(out)
```